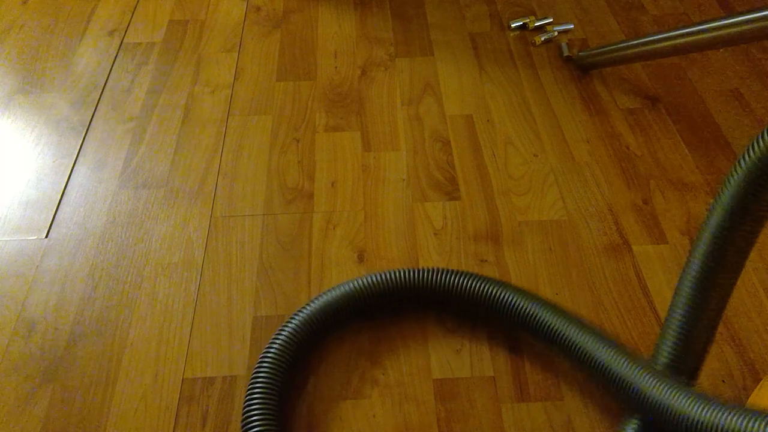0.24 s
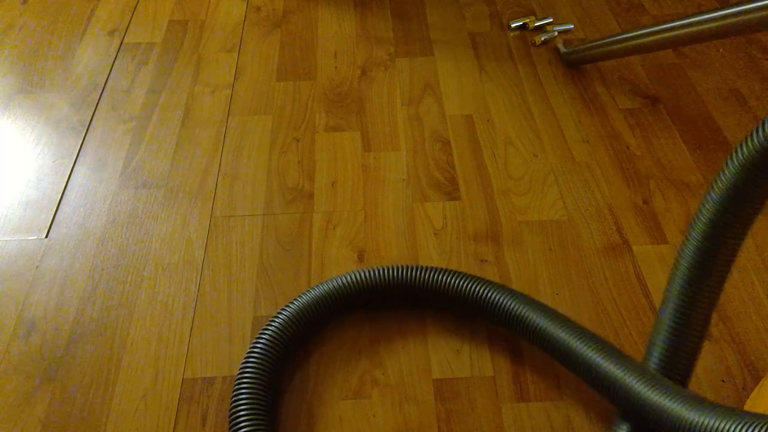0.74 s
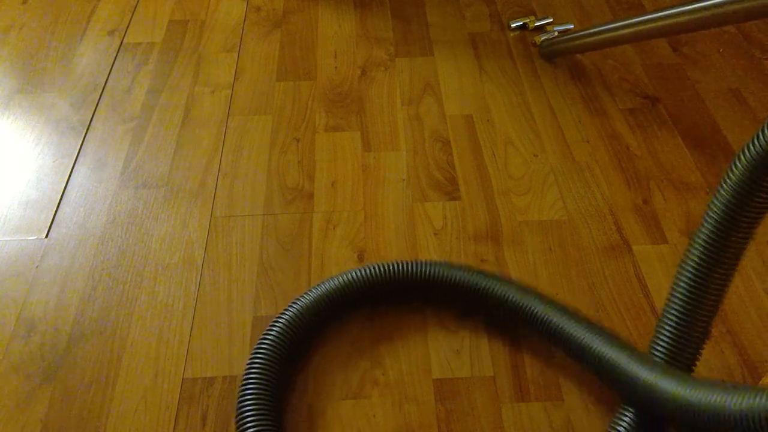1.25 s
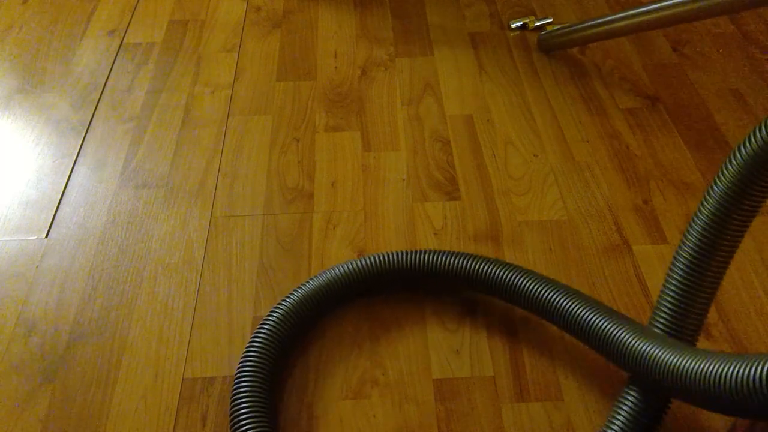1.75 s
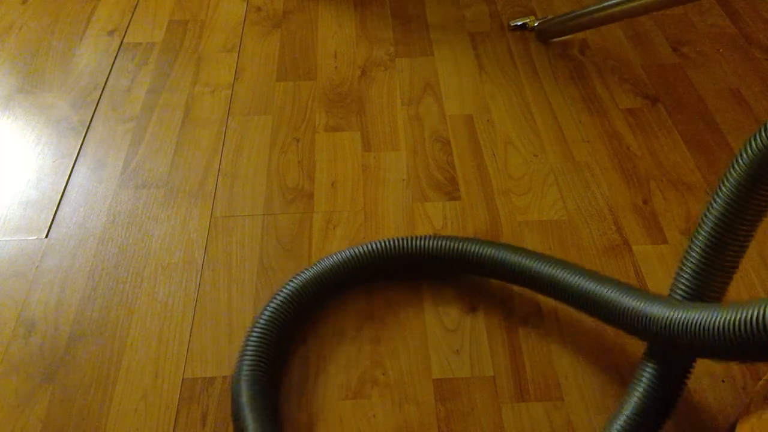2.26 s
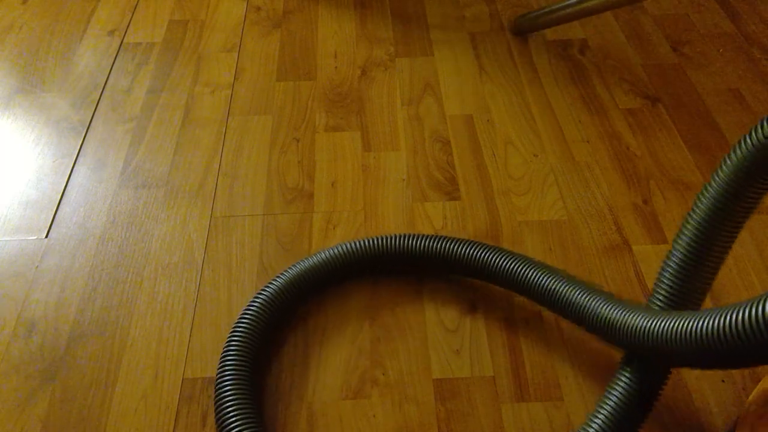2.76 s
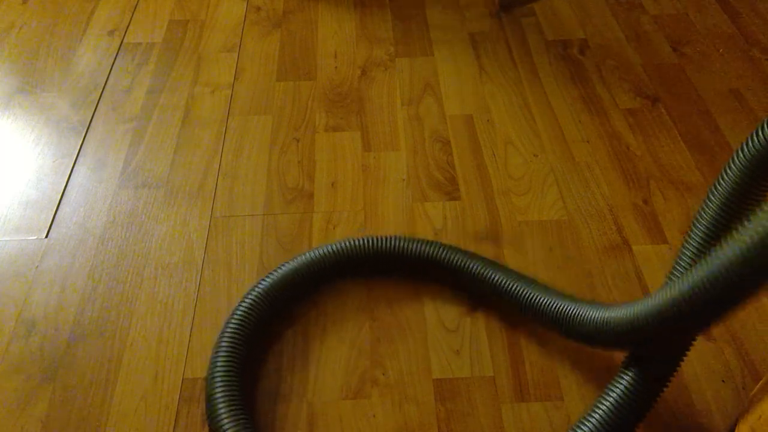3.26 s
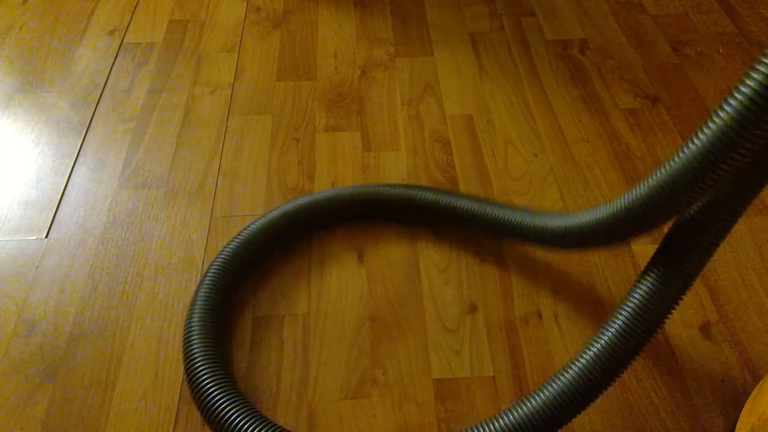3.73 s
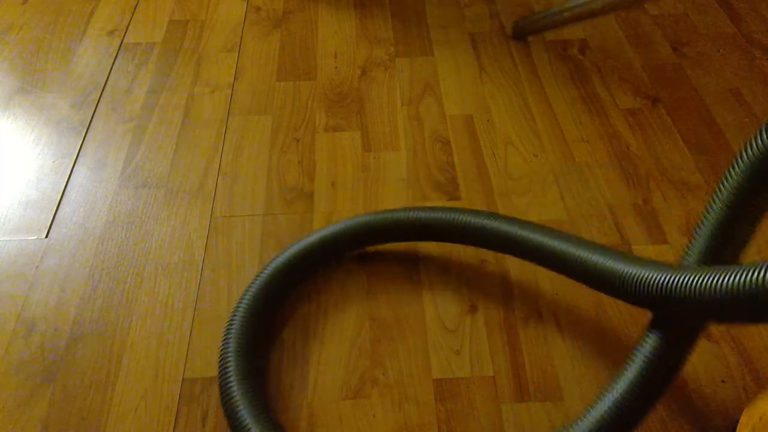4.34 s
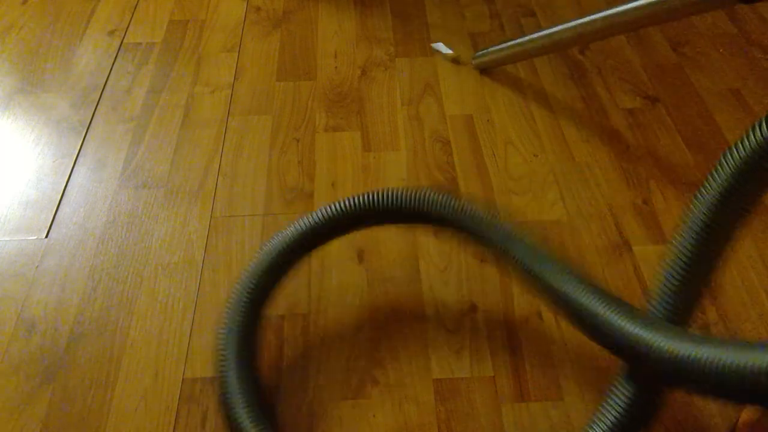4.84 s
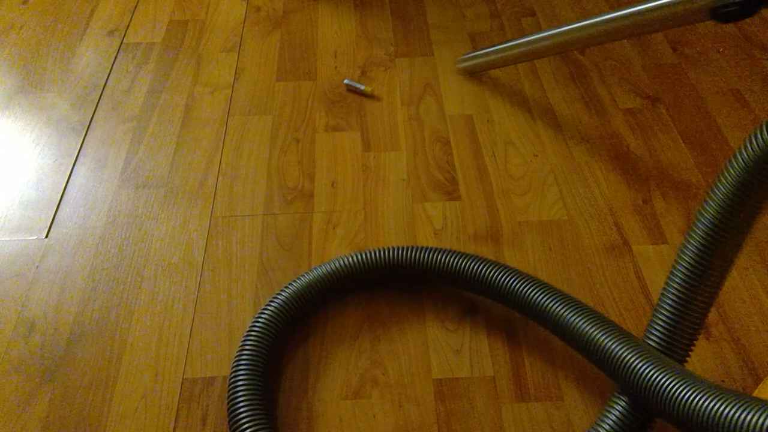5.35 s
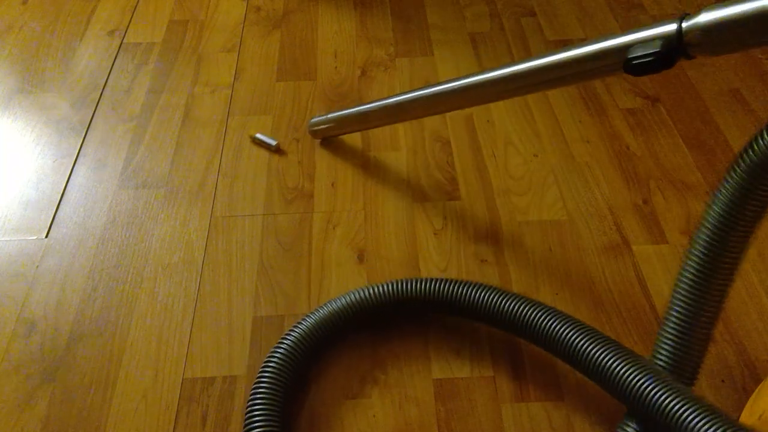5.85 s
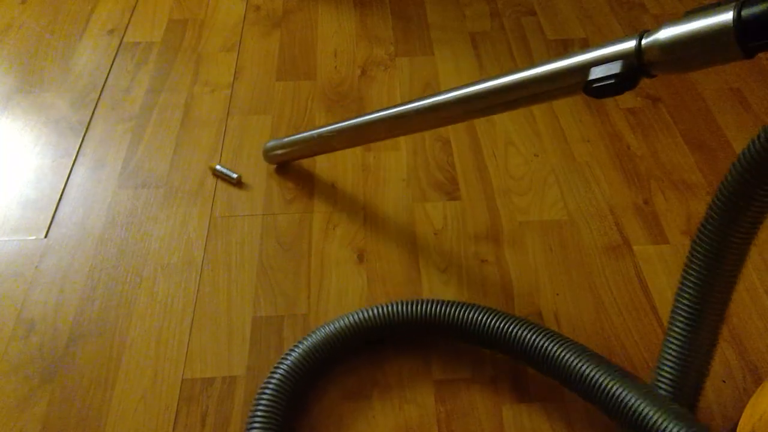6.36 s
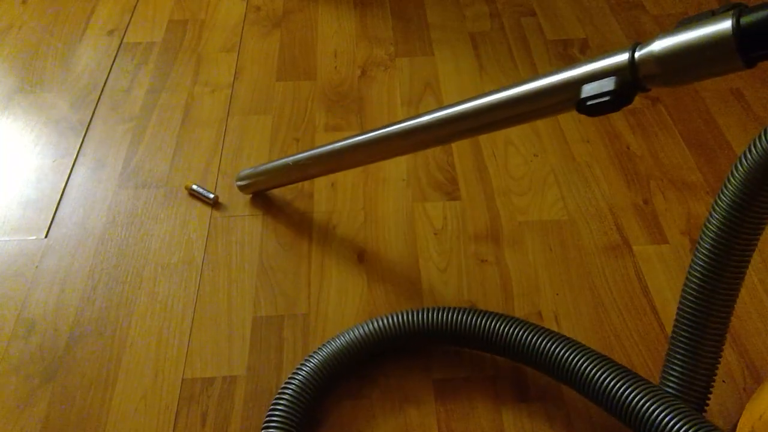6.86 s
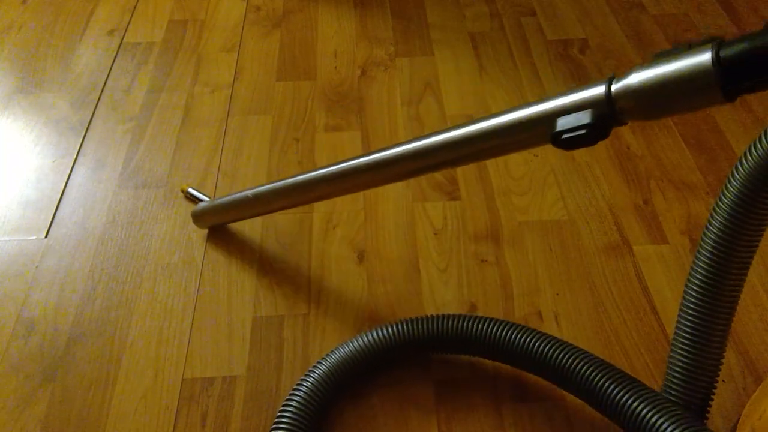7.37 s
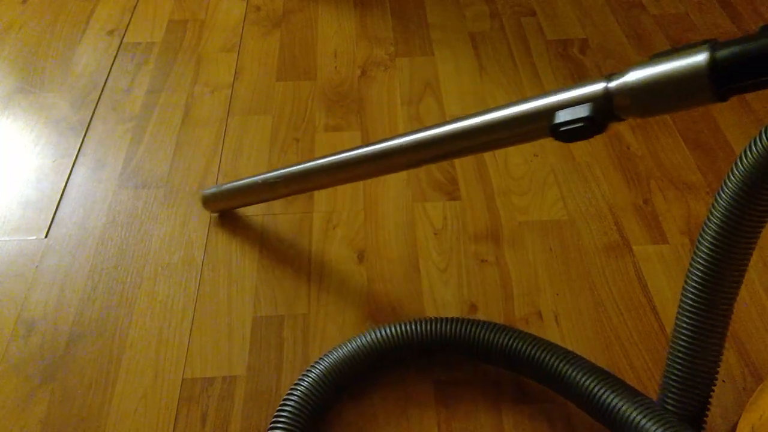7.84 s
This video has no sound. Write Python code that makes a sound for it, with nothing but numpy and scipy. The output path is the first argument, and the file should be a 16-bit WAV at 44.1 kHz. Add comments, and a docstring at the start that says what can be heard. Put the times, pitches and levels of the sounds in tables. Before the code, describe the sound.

A vacuum cleaner's steady whine and airy suction as small batteries clink up a metal tube, rasp along a ribbed hose and knock into hard plastic.

```python
"""A vacuum cleaner sucks small batteries off a wooden floor, in a small room.
Its motor is coloured noise with a fan whine; air at the nozzle is noise that hisses, rings and whistles.
Batteries clink and chatter in the metal tube: bursts and streams of tiny impacts through resonances.
They rasp and thump along the ribbed hose and knock into hard plastic; loud knocks duck the gain."""
import sys
import numpy as np
from scipy import signal
from scipy.fft import rfft, irfft
from scipy.io import wavfile
from scipy.ndimage import uniform_filter1d

SR = 44100
rng = np.random.default_rng(int(sys.argv[2]) if len(sys.argv) > 2 else 0)


def materialize(psi):
    """Save the field psi as 16-bit PCM at rate SR to the path in sys.argv[1].

    A 1-D psi becomes a single channel; in a 2-D psi each row is a channel.
    """
    bounded = np.clip(np.atleast_2d(psi).T, -1, 1)
    quanta = np.round(bounded * 32767).astype(np.int16)
    wavfile.write(sys.argv[1], SR, quanta)


N = 357210
TIME = np.arange(N) / SR

# Resonances of the metal tube. Each row: pitch in Hz, width in Hz, level in dB.
TUBE_MODES = [(2618, 63, 11), (3010, 420, 9), (3780, 710, 2), (4760, 170, 4.5), (5190, 52, 13),
              (5800, 91, -2.5), (6420, 180, -3)]


def amp(db):
    """Turns decibels into a factor on the waveform."""
    return 10 ** (np.asarray(db) / 20)


def unit(x):
    """Scales a signal to rms 1."""
    return x / np.sqrt(np.mean(x ** 2) + 1e-20)


def read(points, hz):
    """Reads a curve between its points, along a logarithmic frequency axis."""
    f, value = np.transpose(points)
    return np.interp(np.log(hz + 1), np.log(f + 1), value)


def add(mix, s, sound):
    """Mixes a sound in at s seconds, cut off where the mix ends."""
    part = mix[:, max(round(s * SR), 0):][:, :sound.shape[-1]]
    part += sound[..., :part.shape[1]]


def level(s, db):
    """A smoothed gain curve that is practically silent outside its span."""
    return uniform_filter1d(amp(np.interp(TIME, s, db, left=-120, right=-120)), size=300)


def bins(x):
    """The frequencies in Hz of a signal's spectrum."""
    return np.fft.rfftfreq(x.shape[-1], 1 / SR)


def colour(x, spectrum):
    """Filters x by a drawn spectrum."""
    return irfft(rfft(x) * amp(read(spectrum, bins(x))), x.shape[-1])


def ring(x, modes):
    """Passes x through a bank of damped resonances."""
    f = bins(x)
    body = sum(amp(db) * 1j * f * width / (hz ** 2 - f ** 2 + 1j * f * width) for hz, width, db in modes)
    return irfft(rfft(x) * body, x.shape[-1])


def pair(x):
    """Two unrelated channels become alike in the bass, as at two close microphones."""
    # Each row: frequency in Hz, likeness of the channels (1 is identical).
    likeness = [(250, 0.89), (800, 0.58), (1500, 0.45), (3000, 0.045)]
    a, b = rfft(x)
    same = np.clip(read(likeness, bins(x)), -1, 1)
    return irfft(np.array([same * a + np.sqrt(1 - same ** 2) * b, a]), x.shape[-1])


def noise():
    """White noise at the two microphones."""
    return pair(rng.standard_normal((2, N)))


def drift(rate):
    """Slow random wander of rms 1, fading out above the rate in Hz."""
    return unit(irfft(rfft(rng.standard_normal(N)) / (1 + (bins(TIME) / rate) ** 4), N))


def fuzzy_tone(hz, width):
    """A turbulent tone at both microphones: slow noise on a carrier that follows a pitch curve."""
    smooth = signal.butter(3, width / 2, fs=SR, output="sos")
    rough = rng.standard_normal((2, len(hz))) + 1j * rng.standard_normal((2, len(hz)))
    wobble = signal.sosfilt(smooth, rough)
    carrier = np.exp(2j * np.pi * np.cumsum(hz) / SR)
    return unit((wobble * carrier).real)


def edge_tone(hz, blow, core_width=26, skirt_width=140, pure_db=-21):
    """Eddies shed at the rim: the harder it blows, the more they lock to one pitch within a breathy skirt."""
    pure = blow ** 2 / (blow ** 2 + amp(2 * pure_db))
    core = np.sqrt(pure) * fuzzy_tone(hz, core_width)
    skirt = np.sqrt(1 - pure) * fuzzy_tone(hz, skirt_width)
    return blow * (core + skirt)


def glide(t, length, first_hz, last_hz):
    """A pitch that moves evenly through a note and on into its release."""
    return first_hz + (last_hz - first_hz) * np.clip(t / length, 0, 2)


def held(t, length, rise, fall):
    """Attack, hold and release around t = 0; rise and fall are the seconds taken for 20 dB."""
    return amp(-20 * (np.maximum(-t, 0) / rise + np.maximum(t - length, 0) / fall))


def envelope(s, length, rise, fall):
    """The samples that an event covers, the time since its start and its gain there."""
    span = slice(max(int((s - 3 * rise) * SR), 0), int((s + length + 3 * fall) * SR))
    t = TIME[span] - s
    return span, t, held(t, length, rise, fall)


def contacts(per_s, spread_db, length):
    """A stream of tiny impacts of uneven size, each a brief burst, evened out in local power."""
    sizes = amp(spread_db * np.minimum(rng.exponential(1, N), 3.5))
    sizes = sizes * (rng.random(N) < per_s / SR)
    power = signal.lfilter([1], [1, -np.exp(-1 / (length * SR))], sizes ** 2)
    power = power / (abs(uniform_filter1d(power, size=3000)) + 1e-3)
    return noise() * np.sqrt(power)


def burst(decay, rise=0.00036):
    """One rough contact: noise that swells briefly and dies."""
    t = TIME[:8192]
    rough = pair(rng.standard_normal((2, len(t))))
    return rough * np.exp(-t / decay) * (1 - np.exp(-(t / rise) ** 2))


def peaked(x):
    """Scales a blow so that its strongest millisecond has the power of a unit sine."""
    return x / np.sqrt(2 * uniform_filter1d((x ** 2).mean(0), size=44).max())


def pan(x, left_db):
    """Sets the level of left minus right in dB."""
    return x * amp(np.array([[.5], [-.5]]) * left_db)


def mottle(x, patchy_db=4.5, patch_hz=220, patch_s=0.07):
    """Narrow bands swell and fade by chance."""
    z = signal.stft(x, nperseg=1024)[2]
    bands = max(round(patch_hz * 1024 / SR), 1)
    frames = max(round(patch_s * SR / 512), 1)
    patches = uniform_filter1d(rng.standard_normal(z.shape[1:]), bands, axis=0)
    patches = unit(uniform_filter1d(patches, frames, axis=1))
    return signal.istft(z * unit(amp(patchy_db * patches)), nperseg=1024)[1][:, :N]


def room(x, wet_db):
    """Dense reflections from floor and walls, each band dying at its own speed."""
    # Each row: frequency in Hz, time to die by 60 dB in seconds.
    decay_times = [(100, 0.33), (1000, 0.26), (12000, 0.14)]
    taps = pair(rng.standard_normal((2, SR // 2)) * (rng.random((2, SR // 2)) < .08))
    hz, t, z = signal.stft(taps, SR, nperseg=256)
    fading = z * amp(-60 * t / read(decay_times, hz)[:, None])
    tail = signal.istft(fading, SR, nperseg=256)[1]
    tail = tail * np.clip(TIME[:tail.shape[1]] / 0.0048 - 1, 0, 1)  # a gap of 4.8 ms, then a fade-in
    return x + amp(wet_db) * signal.fftconvolve(x, tail / np.linalg.norm(tail[0]), axes=1)[:, :N]


def hand():
    """The hand moves the nozzle over the floor: its travel, and the level of ringing and whine, per sample."""
    # Each row: time in seconds, travel in m, ringing and whine in dB (low while batteries block the nozzle).
    moves = [(0, 0.18, -10.5), (2.502, -0.061, -4.5), (3.6, -0.14, -6.5), (4.8, 0.067, -3.5),
             (5.4, 0.114, -0.5), (7.198, 0.26, 0), (8.1, 0.44, -1.5)]
    s, *columns = np.transpose(moves)
    return [np.interp(TIME, s, column) for column in columns]


def moving_echoes(x, strength=0.72, count=8):
    """Paths by floor and walls change length as the nozzle moves, so fine bands glide through the hiss."""
    travel, _ = hand()
    out = x.copy()
    for channel in range(2):
        for delay, angle in rng.random((count, 2)):
            late = .0005 + .007 * delay + travel * np.cos(np.pi * angle) / 343  # speed of sound, m/s
            out[channel] += strength * np.interp(TIME - late, TIME, x[channel], left=0)
    return out / np.sqrt(1 + count * strength ** 2)


def bend(x):
    """Pitches wander slowly up and down, as the playing speed of the signal drifts."""
    clock = np.cumsum(1 + .016 * drift(1.2)) / SR
    return np.array([np.interp(clock, TIME, channel, period=N / SR) for channel in x])


def air_level(air_db=-37.5):
    """Steady suction that swells and dips smoothly; the dips follow loud knocks, as the gain drops."""
    # Each row: middle in seconds, half length in seconds, change in dB.
    swells = [(0.68, 0.43, 4.5), (2.5, 0.11, -13), (3.68, 0.45, -7), (3.9, 0.11, 9.5), (4.55, 0.82, 6)]
    return amp(air_db + sum(db * np.exp(-((TIME - s) / half) ** 2) for s, half, db in swells))


def machine(body_db=-40, whine_db=-36, waver=0.00059, fan_hz=2180, fan_hz_per_db=1.24):
    """The motor runs steadily; its fan whine is a wavering sine, a little lower in pitch when softer."""
    # Each row: frequency in Hz, density in dB per Hz.
    motor_spectrum = [(20, -15), (60, -18), (100, -1.5), (170, -7), (235, 5.5), (320, -3), (440, 6),
                      (600, -3), (1100, -7), (2000, -1.5), (3500, -16), (8000, -43), (16000, -39)]
    _, ring_db = hand()
    turns = np.cumsum((fan_hz + fan_hz_per_db * ring_db) * (1 + waver * drift(2.65))) / SR
    whine = np.array([np.sin(2 * np.pi * (turns + rng.random())) * amp(0.68 * drift(28)) for _ in range(2)])
    body = unit(colour(noise(), motor_spectrum))
    return amp(body_db) * body + amp(whine_db + ring_db) * unit(whine)


def suction(hiss_db=4, ringing_db=8, throat_db=-1, throat_hz=2700, throat_width=900):
    """Turbulence hisses at the mouth through a broad throat resonance and narrow ringing bands."""
    # Each row: frequency in Hz, density in dB per Hz.
    hiss_spectrum = [(20, -58), (900, 14), (1800, 21), (2800, 11), (4500, 13.5), (6500, 13.5), (8000, 7),
                     (10000, 0), (12500, 7), (16000, 4.5)]
    # Narrow ringing bands in the nozzle's air, the lowest being motor whine that leaks through the hose.
    # Each row: pitch in Hz, width in Hz, level in dB.
    ringing_bands = [(2126, 18.6, 17.5), (2367, 25, 13.5), (2614, 20, 12.5), (2927, 33, 5), (3420, 86, 1),
                     (3740, 53, 7), (4804, 42, 5.5), (5210, 26, 4.5), (6080, 32, -10), (8940, 1100, -4.5),
                     (10685, 190, -5.5)]
    _, ring_db = hand()
    hiss = amp(hiss_db) * unit(colour(noise(), hiss_spectrum))
    throat = ring(noise(), [(throat_hz, throat_width, 0)])
    throat = amp(throat_db) * unit(ring(throat, [(throat_hz, 2 * throat_width, 0)]))
    ringing = amp(ringing_db) * unit(bend(ring(noise(), ringing_bands)))
    return moving_echoes(hiss + amp(ring_db) * (throat + ringing)) * air_level()


def gliding_bands(gain_db=0, base_width=25, width_share=0.017):
    """Thin, narrow bands of air noise glide in pitch; the steady one near 2150 Hz is motor whine."""
    # Each row: start in seconds, length in seconds, level in dB, first pitch in Hz, last pitch in Hz.
    glides = [(2.285, 0.094, -19.5, 1970, 2046), (3.03, 0.066, -20.5, 2000, 2080),
              (5.061, 0.26, -29.5, 2510, 2660), (5.13, 1.16, -34, 2154, 2130),
              (5.66, 0.41, -36, 3600, 3410), (6.219, 0.8, -36.5, 3190, 2820),
              (6.329, 0.4, -32.5, 2700, 2590), (6.352, 0.21, -38.5, 4260, 4190),
              (7.04, 0.077, -26, 1940, 1970), (7.42, 0.25, -30.5, 2246, 2325)]
    out = np.zeros((2, N))
    for s, length, db, first_hz, last_hz in glides:
        span, t, shape = envelope(s, length, rise=0.06, fall=0.08)
        band = fuzzy_tone(glide(t, length, first_hz, last_hz), base_width + width_share * first_hz)
        out[:, span] += amp(db + gain_db) * shape * band
    return out


def whistle(long_db=1, toot_db=0, waver_hz=8, flutter_db=1.0, toot_left_db=-14.5):
    """The open mouth, close over the floor, whistles at its edge: one long wavering note, then short toots."""
    # Each row: time in seconds, level in dB before long_db, pitch in Hz, left minus right in dB.
    long_note = [(5.6, -33, 1446, 12), (5.72, -32.5, 1360, 4), (5.779, -16.5, 1375, 0),
                 (5.831, -30, 1403, 10), (5.949, -26, 1490, -8), (6.089, -27, 1390, 8),
                 (6.55, -21, 1495, -3), (6.704, -20, 1477, -1), (6.775, -13, 1438, -9),
                 (6.93, -19, 1433, -5), (6.969, -15.5, 1445, -11), (7.151, -24.5, 1515, 0)]
    # Each row: start in seconds, length in seconds, level in dB, first pitch in Hz, last pitch in Hz.
    toots = [(7.279, 0.08, -26, 1440, 1400), (7.439, 0.099, -23, 1365, 1400),
             (7.679, 0.04, -16.5, 1403, 1363), (7.973, 0.1, -18.5, 1380, 1418)]
    s, db, pitch, left_db = np.transpose(long_note)
    hz = np.interp(TIME, s, pitch) + waver_hz * drift(9)
    blow = level(s, db + long_db) * amp(flutter_db * drift(6.4))
    out = pan(pair(edge_tone(hz, blow)), np.interp(TIME, s, left_db))
    for s, length, db, first_hz, last_hz in toots:
        span, t, shape = envelope(s, length, rise=0.025, fall=0.093)
        toot = edge_tone(glide(t, length, first_hz, last_hz), amp(db + toot_db) * shape)
        out[:, span] += pan(toot, toot_left_db)
    return out


def squeals(gain_db=0, base_width=330, width_share=0.097, sag_octaves_per_s=0.12):
    """A battery narrows the airway and the jet beside it sings hoarsely, wider if higher, sagging as it passes."""
    # Each row: start in seconds, length in seconds, level in dB, pitch in Hz halfway through.
    squeezes = [(0.896, 0.096, -20, 1500), (0.961, 0.056, -25.5, 752), (1.123, 0.3, -30.5, 1384),
                (2.149, 0.026, -27, 7080), (2.302, 0.043, -16, 2020), (3.606, 0.036, -32.5, 7900),
                (3.868, 0.14, -22, 2570), (4.051, 0.71, -25, 2842), (4.107, 0.35, -24, 740),
                (4.695, 0.047, -13.5, 1977), (5.448, 0.19, -27, 1678)]
    out = np.zeros((2, N))
    for s, length, db, pitch in squeezes:
        span, t, shape = envelope(s, length, rise=0.045, fall=0.1)
        hz = pitch * 2 ** (-sag_octaves_per_s * (t - length / 2))
        out[:, span] += amp(db + gain_db) * shape * fuzzy_tone(hz, base_width + width_share * pitch)
    return moving_echoes(out)


def slide(rasp_db=-3, boom_db=-5.0, rasp_growth_db=17, boom_growth_db=2.5):
    """Batteries skip over the hose's ribs and shake its wall, louder as they gather speed."""
    # Each row: start in seconds, length in seconds, then rasp and wall boom in dB at the end
    # of the run, before rasp_db and boom_db.
    runs = [(1.95, 0.65, -24.5, -24), (2.85, 0.41, -19, -28), (3.78, 1.175, -23.5, -30.5),
            (5.03, 0.17, -49, -31)]
    # Spectra of the ribs and of the wall. Each row: frequency in Hz, density in dB per Hz.
    rasp_spectrum = [(20, -75), (300, -1), (430, 7.5), (660, 3), (800, 5.5), (1000, 0), (1500, -22),
                     (16000, -74)]
    boom_spectrum = [(20, -30), (100, -11.5), (160, -14), (235, -0.5), (290, 1), (350, -27), (16000, -140)]
    rasp, boom = np.zeros((2, N))
    for s, length, ribs_db, wall_db in runs:
        span, t, shape = envelope(s, length, rise=0.013, fall=0.3)
        ahead = np.clip(1 - t / length, 0, 1)  # share of the run still to go
        rasp[span] += shape * amp(ribs_db + rasp_db - rasp_growth_db * ahead)
        boom[span] += shape * amp(wall_db + boom_db - boom_growth_db * ahead)
    taps = contacts(per_s=260, spread_db=3.5, length=0.0043)
    return rasp * unit(colour(taps, rasp_spectrum)) + boom * unit(colour(taps, boom_spectrum))


def thumps(gain_db=-1, rise=0.0042, wall_db=-9):
    """A battery bumps the soft hose wall, which swells and dies within a few cycles."""
    # Each row: start in seconds, peak in dB before gain_db, pitch in Hz.
    bumps = [(0.251, -24.5, 245), (0.66, -23.5, 170), (1.944, -13, 242), (1.991, -12.5, 250),
             (2.136, -13.5, 234), (2.176, -16, 255), (2.267, -7, 283), (2.29, -12.5, 374),
             (3.477, -17, 242), (3.757, -11, 214), (3.812, -11, 211), (3.86, -13.5, 306), (3.946, -18, 242),
             (4.479, -11.5, 247), (4.632, -13.5, 233), (4.773, -4, 259), (5.025, 1, 268), (5.159, -8, 234),
             (5.188, -8.5, 465), (5.23, -8, 243), (5.65, -9.5, 477), (6.871, -21, 366), (7.158, -3, 315)]
    out, t = np.zeros((2, N)), TIME[:8192]
    for s, db, hz in bumps:
        swing = t / rise * np.exp(1 - t / rise) * np.sin(2 * np.pi * hz * t)
        wall = peaked(ring(burst(decay=0.028), [(hz, hz, 0)]))
        add(out, s, amp(db + gain_db) * (swing + amp(wall_db) * wall))
    return out


def knocks(gain_db=2, damping=0.36, blow_db=-3, shell_db=0, shell_follows=0.13, crack_db=-2, shudder_db=-22):
    """A battery hits hard plastic: a hollow blow, a short crack, and a shell louder after a sharp crack."""
    # Each row: start in seconds, level in dB before gain_db, pitch in Hz, crack in dB before crack_db.
    hits = [(0.044, 2.5, 564, -11), (1.329, -16, 510, -2.5), (1.366, -17.5, 810, -5),
            (1.518, -4.5, 583, -66), (1.677, -7, 874, -28), (1.762, -18, 590, 1), (2.351, -10, 786, -5),
            (2.489, 2.5, 693, -10.5), (2.532, 3.5, 696, -26), (2.571, -5, 990, -12), (2.683, -15, 1100, -3),
            (3.074, -10.5, 830, -2), (3.095, -8, 830, -18), (3.172, -1, 600, -6), (3.222, 3.5, 920, -8),
            (3.287, -9, 1270, -3), (3.311, -4, 540, -37), (4.814, 8.5, 627, -15.5), (4.833, 10.5, 730, -18),
            (4.858, 10.5, 550, -16), (4.874, 11.5, 771, -15), (7.156, 5, 684, -8)]
    # Each row: pitch in Hz, width in Hz, level in dB.
    shell_modes = [(402, 41, -2), (604, 94, -1), (842, 120, 4.5), (1192, 116, 7), (1570, 240, -1)]
    # Each row: frequency in Hz, density in dB per Hz.
    crack_spectrum = [(20, -7.5), (800, 5), (2000, 9), (3500, 2.5), (6000, -4.5), (16000, -53)]
    out, push = np.zeros((2, N)), signal.unit_impulse(8192)
    for s, db, hz, crack in hits:
        hollow = [(hz, damping * hz, 0)]
        blow = peaked(ring(ring(ring(push, hollow), hollow), hollow)[None])
        contact = burst(decay=0.006, rise=0.0027) + amp(shudder_db) * burst(decay=0.056, rise=0.0037)
        shell = peaked(ring(ring(contact, shell_modes), [(0.39 * hz, 0.77 * hz, 0)]))
        snap = peaked(colour(burst(decay=0.026, rise=0.0032), crack_spectrum))
        hit = amp(blow_db) * blow
        hit = hit + amp(shell_db + shell_follows * crack) * shell
        hit = hit + amp(crack + crack_db) * snap
        add(out, s, amp(db + gain_db) * hit)
    return out


def chatter(metal_db=-2, bore_db=-2, grit_db=-17):
    """Quick small contacts ring the tube wall and the air inside it, with a gritty scrape on top."""
    # Each row: start in seconds, length in seconds, then metal ring and hollow bore in dB
    # before metal_db and bore_db.
    rattles = [(0.225, 0.09, -28, -24), (0.303, 0.027, -33.5, -43), (0.45, 0.6, -33.5, -45),
               (0.97, 0.1, -31, -27), (1.808, 0.073, -25, -18.5), (2.291, 0.023, -21, -16.5),
               (2.484, 0.18, -24.5, -20), (2.91, 0.04, -22, -18.5), (3.036, 0.08, -28, -24),
               (3.834, 0.14, -27, -35), (7.7, 0.065, -23.5, -19.5)]
    # Resonances of the air in the tube. Each row: pitch in Hz, width in Hz, level in dB.
    bore_modes = [(1388, 26, 9.5), (1566, 130, 7.2), (1856, 120, 6.6)]
    metal, bore = np.zeros((2, N))
    for s, length, wall_db, hollow_db in rattles:
        span, _, shape = envelope(s, length, rise=0.045, fall=0.19)
        metal[span] += amp(wall_db) * shape
        bore[span] += amp(hollow_db) * shape
    taps = contacts(per_s=230, spread_db=5.0, length=0.0015)
    wall = unit(ring(taps, TUBE_MODES)) + amp(grit_db) * unit(taps)
    air = ring(contacts(per_s=310, spread_db=3.0, length=0.00063), bore_modes)
    air = unit(ring(air, [(1530, 10000, 0)]))
    return moving_echoes(amp(metal_db) * metal * wall + amp(bore_db) * bore * air)


def clinks(gain_db=-1, focus_hz=2000, tick_db=-13, tick_decay=0.013, ping_db=-4, ping_rise=0.0025):
    """Each strike gives a sharp tick and rings the tube, most around its own pitch, where a ping hangs on."""
    # Each row: start in seconds, level in dB before gain_db, brightest pitch in Hz.
    strikes = [(0.144, -17.5, 5230), (0.248, -15.5, 4600), (0.306, -14.5, 5240), (0.329, -15.5, 5230),
               (0.39, -21, 3140), (0.419, -24, 5220), (0.474, -18.5, 2530), (0.483, -28, 3340),
               (0.655, -15, 3110), (0.751, -15, 5310), (0.872, -20, 4070), (0.994, -7.5, 3210),
               (1.004, -12.5, 2780), (1.034, -18, 3320), (1.225, -6, 3040), (1.306, -16, 5370),
               (1.346, -21.5, 2970), (1.415, -20, 5260), (1.569, -17.5, 2800), (1.63, -24, 3390),
               (1.738, -16, 3110), (1.815, -13.5, 2150), (1.832, -12.5, 3580), (1.856, -12, 2600),
               (1.928, -13.5, 2690), (2.285, -10, 2690), (2.653, -15, 2670), (2.773, -19, 5225),
               (2.865, -5.5, 3740), (2.922, -10.5, 3540), (2.939, -11, 4360), (3.013, -14, 2000),
               (3.108, -9, 2650), (3.477, -19, 5270), (3.803, -12, 4550), (3.82, -13.5, 3750),
               (3.965, -6, 2450), (5.65, -17.5, 5310), (7.727, -12, 4160), (7.798, -11, 5290),
               (7.882, -18, 3790), (8.021, -14, 5780)]
    # Each row: frequency in Hz, density in dB per Hz.
    tick_spectrum = [(300, -13), (2500, 5), (7000, -5), (16000, -14.5)]
    out, t = np.zeros((2, N)), TIME[:8192]
    for s, db, hz in strikes:
        # one mode of the tube, at 5197 Hz, rings far longer than the rest
        ping_decay = 0.0061 + 0.026 * np.exp(-((hz - 5197) / 62) ** 2)
        metal = ring(ring(burst(decay=0.0067, rise=0.00085), TUBE_MODES), [(hz, focus_hz, 0)])
        ping = np.sin(2 * np.pi * (hz * t + rng.random((2, 1))))
        ping = ping * np.exp(-t / ping_decay) * (1 - np.exp(-t / ping_rise))
        tick = colour(burst(decay=tick_decay, rise=0.0023), tick_spectrum)
        strike = peaked(metal) + amp(ping_db) * peaked(ping) + amp(tick_db) * peaked(tick)
        add(out, s, amp(db + gain_db) * strike)
    return out


def scene():
    """Air, metal tube and hose sound together at two microphones, the left one duller."""
    # Each row: frequency in Hz, left minus right in dB.
    shade = [(50, -2.5), (250, 0.5), (700, -2.5), (1400, 0), (2200, -3), (3200, -8.5), (9000, -14)]
    air = machine() + whistle() + gliding_bands() + mottle(suction() + squeals())
    rattling = mottle(chatter(), patchy_db=6.5, patch_hz=350, patch_s=0.036)
    metal = room(clinks() + rattling, wet_db=-4.5)
    hose = pan(room(knocks() + thumps() + slide(), wet_db=-10.5), left_db=4.5)
    return irfft(pan(rfft(air + metal + hose), read(shade, bins(TIME))), N)


def record(dry, limit_db=-1, share=0.69, recovery_db_per_s=23, edge_hz=15950):
    """A limiter drops the gain at each overload and recovers slowly; what is left clips; then the band limit."""
    over_db = 20 * np.log10(abs(dry).max(0) + 1e-9) - limit_db
    fall = TIME * recovery_db_per_s
    duck_db = share * np.maximum(np.maximum.accumulate(over_db + fall) - fall, 0)
    limited = np.clip(dry / amp(uniform_filter1d(duck_db, size=90)), -1, 1)
    low_pass = signal.firwin(511, edge_hz, window=("kaiser", 9), fs=SR)
    return signal.oaconvolve(limited, low_pass[None], "same")


dry = scene()
out = record(dry)
materialize(out)
```